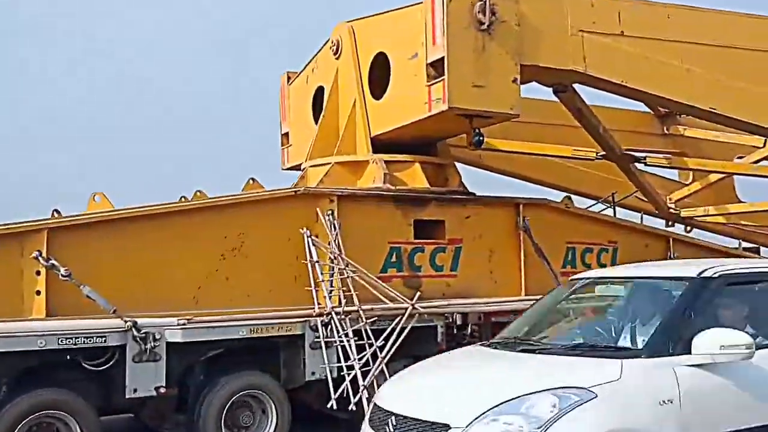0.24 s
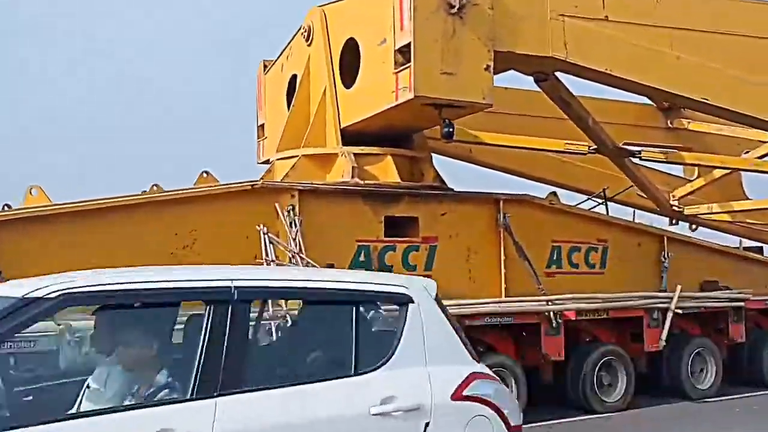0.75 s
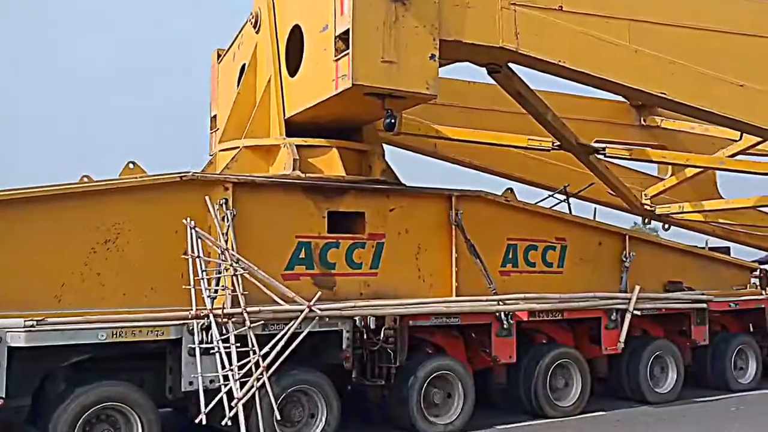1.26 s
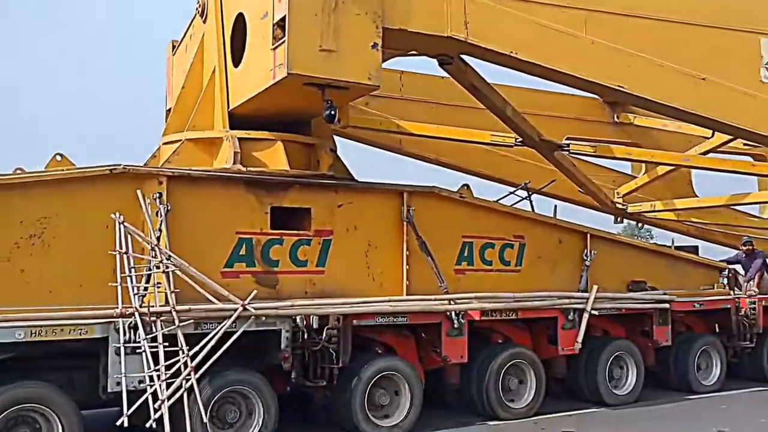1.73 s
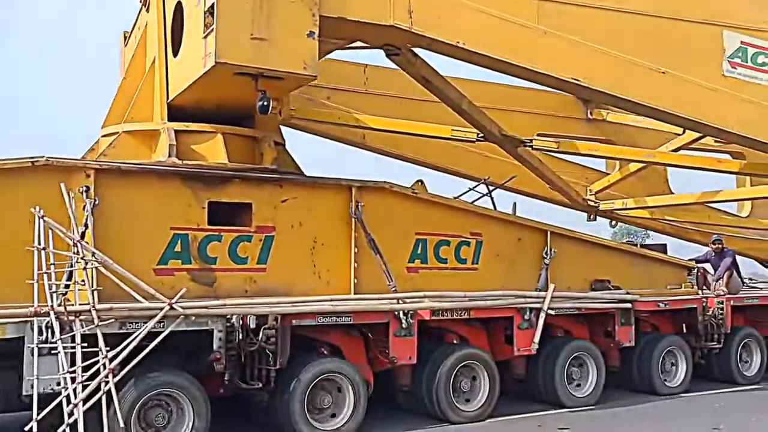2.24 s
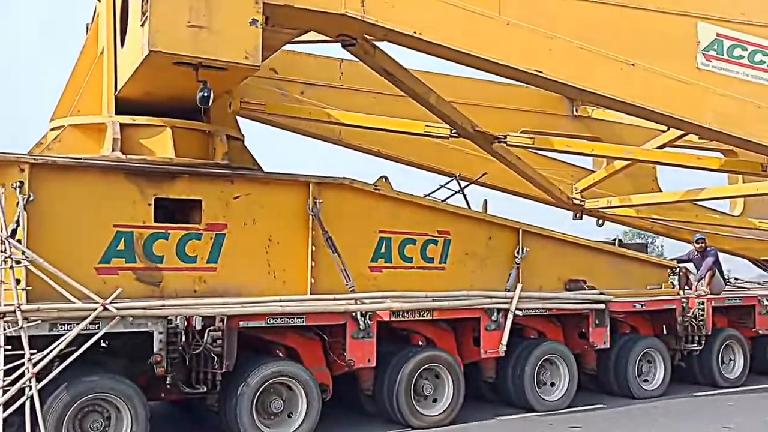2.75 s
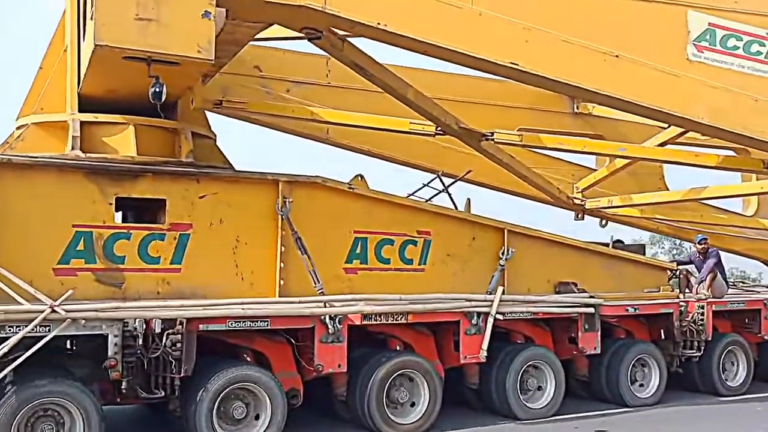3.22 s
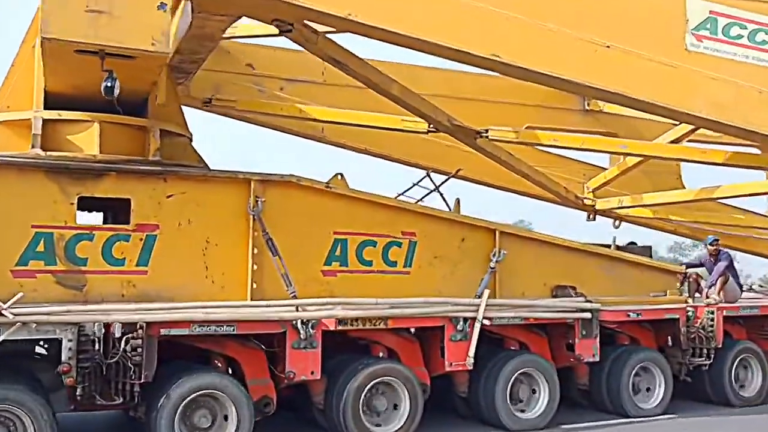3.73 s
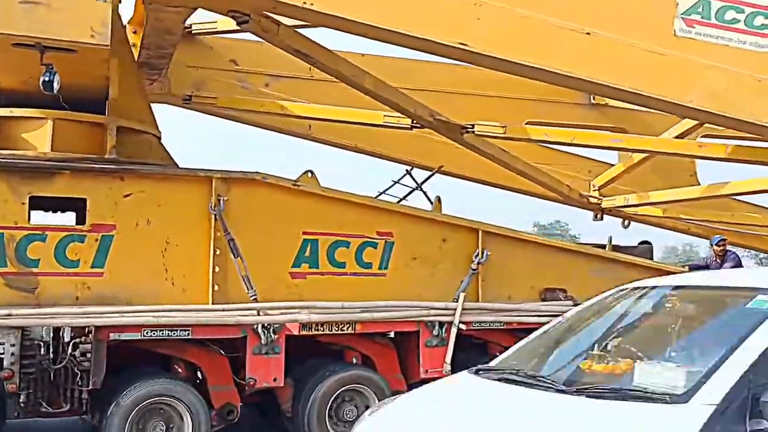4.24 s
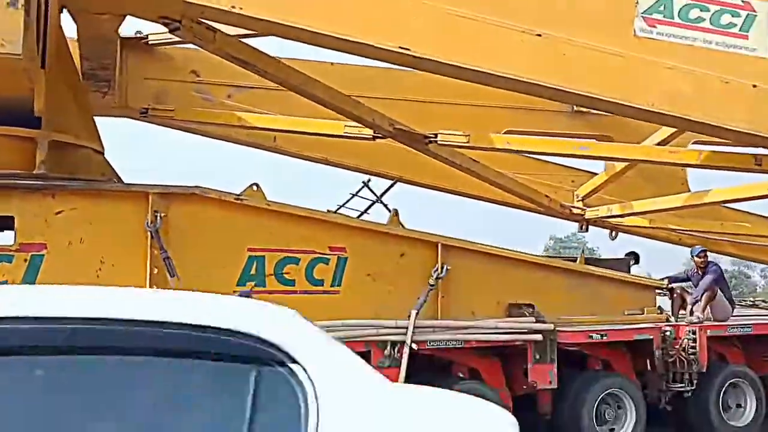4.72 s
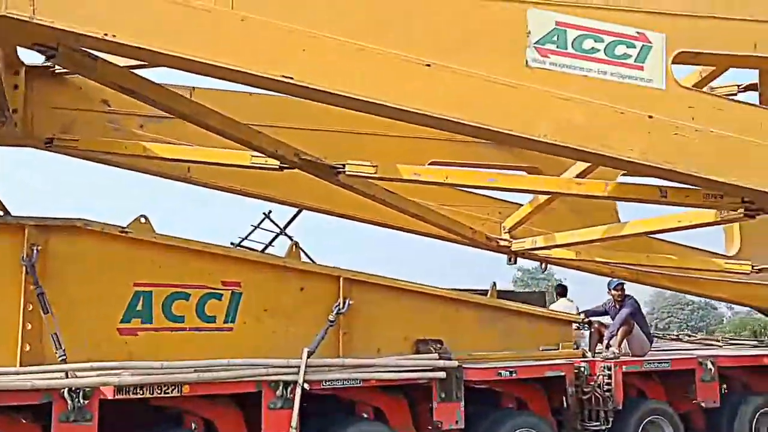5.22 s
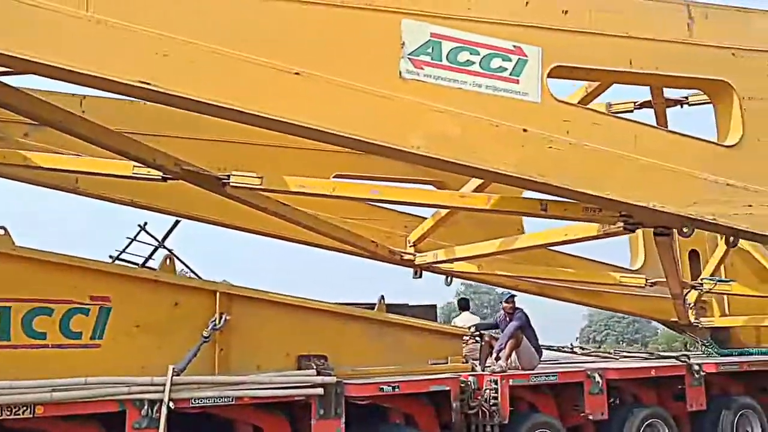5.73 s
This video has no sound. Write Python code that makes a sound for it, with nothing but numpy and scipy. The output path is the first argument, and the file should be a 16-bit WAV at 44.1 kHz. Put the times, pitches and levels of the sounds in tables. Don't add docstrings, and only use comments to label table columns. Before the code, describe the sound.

Steady, uneven engine hum and tyre roar of a slow convoy fill the close roadside stereo sound. An early high, buzzy toot lasts a fraction of a second. After a plain rolling passage, loose steel clatters and girders boom, short rough grinds follow, then harder clanks and long hollow ringing cluster late. The rattling thins, one last boom sounds, and a small car engine rises at the close.

```python
import sys
import numpy as np
from scipy import signal
from scipy.fft import rfft, irfft
from scipy.io import wavfile
from scipy.ndimage import uniform_filter1d

SR = 44100
rng = np.random.default_rng(int(sys.argv[2]) if len(sys.argv) > 2 else 0)


def persist_wave(psi):
    counts = np.round(np.clip(psi, -1, 1) * 32767).astype(np.int16)
    wavfile.write(sys.argv[1], SR, np.atleast_2d(counts).T)


def field_ratio(decibels):
    return 10 ** (np.asarray(decibels, dtype=float) / 20)


N = 263310
T = np.arange(N) / SR
HZ = np.maximum(np.arange(N // 2 + 1) * SR / N, 1)


def in_time(rows):
    s, *columns = np.transpose(rows)
    return [np.interp(T, s, c) for c in columns]


def in_pitch(rows):
    hz, *columns = np.transpose(rows)
    return [np.interp(np.log(HZ), np.log(hz), c) for c in columns]


def rms_one(x):
    return x / np.sqrt(np.mean(x ** 2) + 1e-20)


def drift(rate_hz):
    pole = np.exp(-80 * np.pi * rate_hz / SR)
    white = rng.standard_normal(N // 40 + 2002)
    slow = signal.lfilter([1], [1, -2 * pole, pole * pole], white)[2000:]
    return np.interp(np.arange(N) / 40, np.arange(len(slow)), rms_one(slow))


def noise_pair():
    return rfft(rng.standard_normal((2, N)))


def coloured(gain):
    return rms_one(irfft(noise_pair() * gain, N))


def three_bands(gain, low_hz, high_hz):
    noise = noise_pair() * gain
    low = 1 / (1 + (HZ / low_hz) ** 4)
    high = 1 / (1 + (high_hz / HZ) ** 6)
    middle = np.clip(1 - low - high, 0, 1)
    return [rms_one(irfft(noise * np.sqrt(power), N)) for power in (low, middle, high)]


def resonances(rows):
    return sum(field_ratio(db) / np.sqrt(1 + (2 * (HZ - hz) / width) ** 2) for hz, width, db in rows)


def struck(s, t60_s, rise_s, order=2):
    out = np.zeros(N)
    part = slice(int(s * SR) + 1, int((s + t60_s + .05) * SR))
    age = T[part] - s
    build = 1 - np.exp(-(age / max(rise_s, 1e-4)) ** order)
    out[part] = build * field_ratio(-60 * age / max(t60_s, .02))
    return out


def tone(hz):
    return np.sqrt(2) * np.sin(2 * np.pi * (np.cumsum(hz) / SR + rng.random()))


def spell(start_s, length_s):
    return 1. * (T > start_s) * (T < start_s + length_s)


def ducking():
    # start_s, depth_db, recovery_s
    ducks = [
        (0.29, -8, 0.46),
        (2.27, -6.5, 0.35),
        (3.17, -12, 0.027),
        (4.64, -11.5, .25),
    ]
    grip_s = 0.016
    loss_db = 0
    for s, db, recovery_s in ducks:
        age = np.maximum(T - s, 0)
        loss_db = loss_db + db * (1 - np.exp(-age / grip_s)) * np.exp(-(age / recovery_s) ** 2 / 2)
    return loss_db


def road():
    # time_s, nearness_db, exhaust_load_db, tyre_bite_db
    passing = [(0.0, -22.5, -5, -5), (0.23, -22.5, 3, 0.5), (0.36, -32.5, 10, 3.5), (0.62, -31, 3.5, -0.5),
               (1.06, -26.5, 4.5, 1), (1.7, -25, 5, -0.5), (1.99, -29.5, 2.5, 3), (2.25, -24.5, -3.5, -2.5),
               (2.7, -33, 8.5, 4), (3.04, -24, -1, 0), (3.29, -32.5, 8.5, 3.5), (3.76, -27, -7, -1.5),
               (4.12, -31.5, -0.5, 6), (4.46, -28.5, -4.5, 0), (4.8, -26, -29.5, -7.5),
               (5.2, -33, -4, -6.5), (5.65, -32.5, 0, 0.5), (5.97, -30, 10.5, 2)]
    # hz, density_db (per Hz)
    colour = [(35, -4.5), (100, 0), (140, 7), (200, 1), (400, -10.5), (800, -16), (1500, -24),
              (2600, -19.5), (3500, -25), (5000, -23), (7000, -27.5), (10300, -33.5), (11500, -60),
              (13000, -84)]
    # hz, width_hz, level_db
    knock_body = [(2050, 300, -3), (2800, 300, -3), (4050, 300, 6), (5500, 900, -7), (8000, 2000, -11)]
    rumble_db, roar_db, hiss_db = -5.0, -4.5, -14
    rumble_ducks = 0.6
    knocks_per_s, sag_per_s = 31, .3
    knock_depth, nearest_s, reach_s = .6, 2.1, 3.2

    near_db, load_db, bite_db = in_time(passing)
    depth = knock_depth * np.exp(-((T - nearest_s) / reach_s) ** 2)
    turns = np.cumsum((knocks_per_s - sag_per_s * T) * (1 + .01 * drift(10))) / SR
    strength_db = rng.normal(0, 1.8, 400) + 1.5 * (np.arange(400) % 2)
    strength = field_ratio(strength_db)[turns.astype(int)]
    phase = turns % 1
    puff = depth * strength * np.exp(-3.5 * phase) * np.minimum(phase * 14, 1)
    knock = coloured(resonances(knock_body) / (1 + (HZ / 10100) ** 40))

    gain = field_ratio(in_pitch(colour)[0]) / (1 + (HZ / 10450) ** 80)
    low, middle, high = three_bands(gain, 391, 2480)
    rumble = low * field_ratio(near_db + load_db + rumble_db + rumble_ducks * ducking() + 2.6 * drift(2.3))
    roar = middle * field_ratio(near_db + roar_db + 1.15 * drift(12.0))
    upper = high + field_ratio(10.5) * puff * knock
    return rumble + roar + field_ratio(near_db + bite_db + hiss_db + 0.74 * drift(8.1)) * upper


def hums():
    # time_s, pitch_hz, level_db
    exhaust = [(0, 85.7, -47), (.5, 85.5, -47), (1.1, 86.6, -43), (1.55, 87, -46), (1.8, 87.4, -34.5),
               (2.3, 87.5, -43.5), (3.13, 88.5, -38.5), (3.6, 88.5, -46), (4.2, 90.3, -39),
               (4.7, 91.4, -45), (5.4, 92.5, -43), (5.97, 95.7, -45)]
    # time_s, pitch_hz, first_order_db, second_order_db; revs pick up
    pull = [(0, 61, -69, -55), (.6, 62.5, -57, -45), (1.0, 63, -50, -48), (1.4, 65.2, -52, -48),
            (1.75, 67.7, -55, -37), (1.9, 67.8, -55, -55.5), (2.6, 71.3, -54, -50), (3.2, 75.8, -54, -67),
            (3.9, 82.2, -80, -78)]
    ground_db = -42

    hz, db = in_time(exhaust)
    out = field_ratio(db + 9.5 + 3.0 * drift(8)) * tone(hz * (1 + .01 * drift(4)))
    hz, first_db, second_db = in_time(pull)
    out += field_ratio(first_db + 16.5 + 1.6 * drift(5)) * tone(hz)
    out += field_ratio(second_db + 11.5 + 6.6 * drift(17)) * tone(2 * hz)
    ground = field_ratio(ground_db) * coloured(resonances([(62, 86, 0)]) ** 2)
    return field_ratio(ducking()) * (out + ground)


def sizzle():
    # start_s, length_s, level_db
    spells = [(0.009, 1.19, -56), (1.409, 0.042, -58), (1.517, 0.273, -59), (1.836, 0.25, -51),
              (2.162, 0.14, -48), (2.666, 0.071, -62), (2.802, 0.398, -55), (3.346, 0.18, -60),
              (3.646, 0.15, -52), (3.867, 0.56, -52.5), (4.488, 0.03, -61), (4.563, 0.08, -46.5),
              (4.849, 0.098, -60), (5.144, 0.11, -52), (5.288, 0.4, -58), (5.781, 0.182, -53)]
    level_db, edge_s = -2.5, 0.037

    gate = sum(field_ratio(db) * spell(s, length) for s, length, db in spells)
    gate = uniform_filter1d(gate, int(edge_s * SR) + 1)
    noise = noise_pair()
    strips = 0
    for k in range(7):
        on = uniform_filter1d(1. * (drift(5) > .3 * k - .9), size=500)
        strip = irfft(noise / (1 + ((HZ - 10500 - 220 * k) / 110) ** 12), N)
        strips = strips + on * field_ratio(-1.5 * k) * strip
    return field_ratio(level_db) * gate * rms_one(strips)


def clanks():
    # start_s, peak_db, low_db, top_db, t60_s
    hits = [(0.052, -34, -10, 20, 0.03), (1.6122, -25, -1, -4, 0.083), (1.752, -22, -2, -2.5, 0.13),
            (1.819, -23.5, 7, -23, 0.11), (1.8896, -30, 8, 4.5, 0.26), (2.2198, -20, 13, -4, 0.13),
            (3.5443, -4, -23, -20, 0.13), (3.586, -12.5, -24, -44, 0.12), (3.6285, -11.5, -18, -55, 0.12),
            (3.695, -22.5, 7, -1.5, 0.22), (3.8964, -41, -19, -23, 0.12), (3.959, -11, 2, -9, 0.079),
            (4.0298, -10.5, -4, -14.5, 0.093), (4.2724, -9.5, -0.5, -8.5, 0.087), (4.3642, -27, 1, 0, 0.13),
            (4.6136, -5.5, 0, -25, 0.11), (4.7414, -34, 1, -34, 0.12), (5.2674, -24.5, -21, -7, 0.19),
            (5.3074, -31.5, 4, -3, 0.7), (5.495, -30, 5, -23, 0.034), (5.837, -33, 7, 4.5, 0.19)]
    # start_s, peak_db, low_db, top_db, t60_s
    grinds = [
        (2.6743, -11.5, -10, -21, 0.12),
        (2.9492, -13, -9, -14, 0.11),
        (2.9794, -15.5, -10, -15, 0.13),
        (3.025, 0, -11, -40, 0.078),
        (3.147, -3, -3.5, -16, 0.1),
        (5.1915, -7.5, 4, -6.5, 0.076),
    ]
    # hz, width_hz, level_db
    body = [(1170, 97, 12), (1500, 74.3, -17), (1970, 230, 13), (2960, 260, 14.5), (3870, 430, -2),
            (4170, 490, 6.5), (6800, 600, 3), (7800, 13000, -1)]
    clank_rise_s, grind_rise_s = 0.0034, 0.011

    low, middle, high = three_bands(resonances(body) / (1 + (HZ / 10400) ** 24), 1880, 5260)
    shape = np.zeros((3, N))
    for rows, rise_s in ((hits, clank_rise_s), (grinds, grind_rise_s)):
        for s, db, low_db, top_db, t60_s in rows:
            start_s = s - rise_s
            shape[0] += field_ratio(db - 12.0 + low_db) * struck(start_s, 1.93 * t60_s, 1.7 * rise_s)
            shape[1] += field_ratio(db - 12.0) * struck(start_s, t60_s, rise_s)
            shape[2] += field_ratio(db - 11.0 + top_db) * struck(start_s, 2.43 * t60_s, rise_s)
    return low * shape[0] + middle * shape[1] + high * shape[2]


def horn():
    # time_s, level_db, pitch_hz
    toot = [
        (0.26, -27, 3284),
        (0.28, -13, 3282),
        (0.302, -21, 3240),
        (0.372, -16.5, 3260),
        (0.41, -17.5, 3250),
        (0.456, -36.5, 3270),
        (0.51, -45, 3280),
    ]
    # multiple, level_db
    lines = [(0.907, -14), (.94, -22), (.962, -12), (1, 1.5), (1.018, -9), (1.046, -10.5), (1.07, -16),
             (1.1, -12), (1.146, -15), (1.165, -30)]
    # hz, width_hz, level_db
    rasp_body = [(2860, 210, -2), (3130, 250, 1), (3330, 240, -18), (8000, 720, -10.5), (9660, 600, -8.5)]

    before = (toot[0][0] - .004, -90, toot[0][2])
    after = (.6, -53, toot[-1][2])
    db, hz = in_time([before, *toot, after])
    pair = np.zeros((2, N))
    for port in pair:
        for k, line_db in lines:
            flutter = 2.0 - 0.176 * max(line_db, -14)
            level = field_ratio(line_db + flutter * drift(60))
            port += level * tone(k * hz * (1 + 0.001185 * flutter * drift(35)))
    rasp = coloured(resonances(rasp_body) ** 1.34)
    return field_ratio(db - 7.5) * (pair + field_ratio(-6.0) * rasp)


def rings():
    # start_s, pitch_hz, level_db, t60_s
    members = [(1.820, 1745, -30.5, 0.17), (1.900, 1360, -32, 0.5), (1.940, 1360, -33, 0.6),
               (1.889, 1090, -32, 0.6), (2.225, 860, -25, 0.2), (2.222, 1105, -23, 0.3),
               (2.245, 1590, -28, .25), (2.25, 1250, -28, .3), (2.27, 1400, -28, .4), (2.235, 600, -28, .4),
               (2.25, 950, -28, .4), (2.46, 665, -32, .8), (2.227, 1469, -28, 0.37), (2.240, 700, -30, .8),
               (3.546, 1110, -34, .4), (3.545, 1530, -30.5, 0.7), (3.546, 930, -32, 0.4),
               (3.700, 610, -24, 0.7), (3.76, 640, -30, .5), (3.695, 1110, -26, 0.3), (3.71, 1380, -29, .5),
               (3.74, 1120, -32, .35), (3.702, 1250, -27, 0.52), (3.960, 1130, -30, 0.15),
               (3.965, 1345, -31, 1.3), (4.03, 1160, -31, .15), (4.03, 1980, -30, .15),
               (4.274, 1130, -27, .13), (4.275, 2000, -28, .2), (4.285, 1345, -32, .9),
               (4.37, 1480, -26, .3), (3.961, 1980, -27, 0.27), (4.362, 598, -22, 0.6),
               (4.375, 1090, -27, 0.4), (4.64, 1100, -32, .8), (4.76, 610, -31, .9), (4.70, 1800, -32, 1.0),
               (4.625, 3600, -33, .4), (5.187, 1560, -27, .18), (5.30, 1550, -40, .4),
               (4.63, 1350, -31, .7), (4.62, 1950, -29, .6), (4.365, 1351, -31.5, 0.37),
               (4.366, 240, -32, 1.7), (4.619, 616, -29, 1.2), (4.619, 1688, -31, 1.14),
               (4.621, 3750, -25, 0.23), (5.189, 1300, -29, 0.25), (5.190, 371, -36, 0.3),
               (5.838, 596, -35, 0.54)]
    flutter_db, wander_share = 4.5, .003

    out = np.zeros((2, N))
    flutter = field_ratio(flutter_db * np.tanh(drift(30)))
    wander = 1 + wander_share * drift(20)
    for s, hz, db, t60_s in members:
        first = int(s * SR)
        shape = struck(s, t60_s, 0.0029)[first:int((s + min(t60_s, 1.1)) * SR)]
        offset = int(rng.random() * (N - 2 * SR))
        luck = slice(offset, offset + len(shape))
        turns = hz * np.cumsum(wander[luck]) / SR
        group = 0
        for k, gain in ((1, 1), (1.011, .6), (.984, .4)):
            group = group + gain * np.sin(2 * np.pi * (k * turns + rng.random((2, 1))))
        out[:, first:first + len(shape)] += field_ratio(db - 1.5) * flutter[luck] * group * shape
    return out


def squeaks():
    # start_s, length_s, pitch_hz, level_db
    whistles = [
        (1.85, .06, 13044, -74),
        (1.85, .06, 13857, -71),
        (1.905, .07, 14513, -67),
        (5.295, .075, 13329, -70),
        (5.36, .03, 12550, -78),
        (5.78, .055, 13534, -75),
        (5.825, .075, 13178, -67),
    ]
    out = 0
    for s, length_s, hz, db in whistles:
        out = out + field_ratio(db) * tone(np.full(N, hz)) * uniform_filter1d(spell(s, length_s), size=600)
    return out


def booms():
    # start_s, peak_db, bottom_db, top_db, t60_s
    blows = [
        (1.89, -17, -7, -7, 0.97),
        (2.2235, -8.5, -6.5, -17, 0.92),
        (3.146, -17.5, 3.5, -30, 0.44),
        (3.545, -30, 19, -25, 0.55),
        (3.698, -16.5, 8.5, -37, 0.95),
        (3.958, -23.5, 1, -21, 0.94),
        (4.275, -17.5, -7, -9, 0.49),
        (4.358, -8.5, -2, -47, 0.73),
        (4.6174, -9, -14, -4, 1.08),
        (5.1868, -23, -2, -4, 0.98),
    ]
    # hz, level_db, t60_s
    girder = [(570, 3, 0.39), (610, 6, 0.5), (641, 6, 0.72), (668, 8, 0.86), (752, 1, 0.46), (776, 7, 0.15),
              (940, 2, 0.3), (1100, 4, 0.4), (1244, 2, 0.5), (1351, 9, 0.54), (1500, 2, 0.13),
              (1900, 3, 0.67), (2967, 10, 0.45), (3810, -6, 0.98)]
    swell_s = 0.023
    thud_db, thud_follows = 2.5, 0.62
    mode_shift, mode_luck_db = .015, 3

    gain = HZ ** -.6 / (1 + (300 / HZ) ** 3) / (1 + (HZ / 6000) ** 4)
    low, middle, high = three_bands(gain, 1250, 2050)
    thud = three_bands(resonances([(240, 42, 0.55), (300, 61, 0.16), (370, 120, -3.1)]), 380, 900)[0]
    out, shake = np.zeros((2, N)), rng.standard_normal((2, N))
    for s, db, low_db, top_db, t60_s in blows:
        rise_s = swell_s * t60_s ** 2
        wash = middle + field_ratio(low_db) * low + field_ratio(top_db + 2.0) * high
        wash = wash + field_ratio(thud_db + thud_follows * low_db) * thud
        swell = struck(s - .002, t60_s, rise_s, order=1)
        slam = 0.14 * struck(s - .001, 0.014, 0.0019)
        out += field_ratio(db - 15.5) * wash * (swell + slam)

        part = slice(int(s * SR) - 60, int((s + 1.2) * SR))
        rattle = (shake * struck(s - .001, 0.32 * t60_s, 0.12 * rise_s))[:, part]
        for hz, mode_db, ring_s in girder:
            luck, shift = rng.normal(0, 1, 2)
            r = field_ratio(-60 / (ring_s * t60_s * 0.8 * SR))
            w = 2 * np.pi * hz * (1 + mode_shift * shift) / SR
            band_db = low_db if hz < 900 else top_db if hz > 2500 else 0
            level = field_ratio(db - 56.0 + band_db + mode_db + mode_luck_db * luck)
            mode = signal.lfilter([0, np.sin(w)], [1, -2 * r * np.cos(w), r * r], rattle)
            out[:, part] += level * mode
    return out


def ticks():
    # start_s, peak_db, pitch_hz
    contacts = [(1.8907, -14, 1150), (1.8995, -15, 1100), (1.9105, -15, 1300), (1.9272, -16, 1100),
                (1.9835, -16, 1500), (2.2262, -7, 1300), (3.5452, -12, 3500), (3.6275, -10, 3600),
                (3.6959, -9, 1000), (3.6985, -9, 1100), (3.8968, -14, 1300), (3.9598, -11, 1600),
                (4.0052, -16, 1500), (4.0296, -12, 1900), (4.2748, -11, 1600), (4.3645, -14, 900),
                (4.375, -10, 1200), (4.5097, -17, 1500), (4.6145, -10, 3600), (4.7900, -14, 1500)]
    decay_cycles = 9.0
    out = np.zeros((2, N))
    for s, db, hz in contacts:
        part = slice(int(s * SR), int((s + .03) * SR))
        turns = np.maximum(T[part] - s, 0) * hz
        out[:, part] += field_ratio(db - 5.0 - 60 * turns / decay_cycles) * np.sin(2 * np.pi * turns)
    return out


def car():
    # hz, width_hz, level_db
    pipe_body = [(155, 40, -3), (210, 60, 0)]
    # multiple, level_db
    firing_orders = [(6, 0), (7, -2), (8, 0), (9, -1), (12, -8)]
    level_db, noise_db, fires_per_s = -31, -4, 25.7
    arrives_s, swell_s = 5.78, .15

    pipe = coloured(resonances(pipe_body) ** 2)
    orders = sum(field_ratio(db + 2.0 * drift(8)) * tone(np.full(N, k * fires_per_s)) for k, db in firing_orders)
    swell = np.exp(-(np.minimum(T - arrives_s, 0) / swell_s) ** 2)
    return field_ratio(level_db) * swell * (rms_one(orders) + field_ratio(noise_db) * pipe)


def scene():
    # hz, road_side_db, steel_side_db (under the sum), tied_share (0-1), tied_phase_rad
    ports = [(22, -34, -26, .9, 2.1), (50, -6, -12, 0.98, 2.35), (120, -16, -31, 0.97, 2.17),
             (293, -11.5, -19, 0.76, 2.14), (715, -4.5, -21, 0.63, 2.7), (1190, 1, -21, 0.3, 2.9),
             (1600, 4, -1.5, 0.37, 3.4), (2410, -2.5, 2.5, 0.1, 4.3), (3000, 3, 0, 0.16, 7.8),
             (4500, 0, -2, 0, 2.8), (11000, -2, 2, 0, 6.3)]
    road_top_hz, steel_top_hz = 12000, 10500

    far = rfft(road() + sizzle() + hums() + car()) / (1 + (HZ / road_top_hz) ** 80) + rfft(squeaks())
    near = rfft(clanks() + booms() + rings() + ticks() + horn()) / (1 + (HZ / steel_top_hz) ** 40)
    far_db, near_db, share, phase = in_pitch(ports)
    share = np.clip(share, 0, 1)
    tied, free = share * np.exp(1j * phase), np.sqrt(1 - share ** 2)
    side = field_ratio(far_db) * (tied * far[0] + free * far[1])
    side = side + field_ratio(near_db) * (tied * near[0] + free * near[1])
    mid = far[0] + near[0]
    return irfft(np.array([mid + side, mid - side]), N)


def flickering_gaps(mid):
    # hz, width_hz, shut_share (of the time)
    gaps = [(2440, 270, .72), (5000, 300, .35), (7620, 340, .55), (10080, 560, .92)]
    out = irfft(mid, N)
    for hz, width_hz, shut in gaps:
        strip = irfft(mid / (1 + (2 * (HZ - hz) / width_hz) ** 12), N)
        loudness = np.log(uniform_filter1d(strip ** 2, size=4000) + 1e-18) / 2
        chance = drift(5) + loudness
        closed = 1. * (chance < np.quantile(chance, shut))
        out = out - strip * uniform_filter1d(closed, size=600)
    return out


def band_limit(x):
    return signal.sosfilt(signal.butter(12, 15000, fs=SR, output="sos"), x)


def record(dry):
    # hz, delay_ms
    delay = [(300, .400), (1250, .400), (2450, .408), (3700, .4054), (5000, .400), (6330, .395),
             (7650, .392), (8950, .391), (11500, .391)]
    # hz, subtracted_share (0-1), gap_reach (comb power below which the gaps deepen)
    depth = [(300, 0.88, 0.0072), (1250, 1, 0.0011), (2350, 0.66, 0.04), (3880, 0.96, 0), (5080, 0.48, 0),
             (6700, 0.3, 0.048), (8400, 0.8, 0), (9500, 0.54, 0.21), (10400, 0.99, 0.21)]

    left, right = rfft(dry) / np.sqrt(1 + (45 / HZ) ** 4)
    share, reach = in_pitch(depth)
    echo = np.clip(share, 0, 1) * np.exp(-2j * np.pi * HZ * in_pitch(delay)[0] / 1000)

    def combed(part, comb):
        power = abs(comb) ** 2
        return part * comb * power / (power + np.abs(reach))

    mid = combed(left + right, 1 - echo)
    side = combed(left - right, 1 + echo)
    mix = (flickering_gaps(mid) + irfft(side, N) * [[1], [-1]]) / 2
    return band_limit(mix)


dry = scene()
out = record(dry)
persist_wave(out)
```